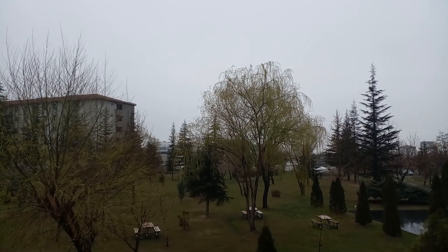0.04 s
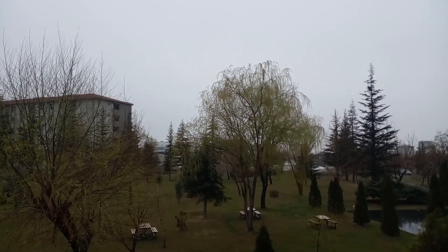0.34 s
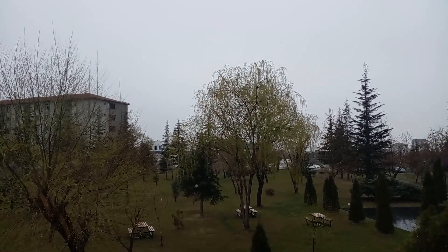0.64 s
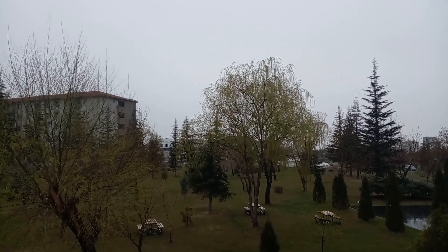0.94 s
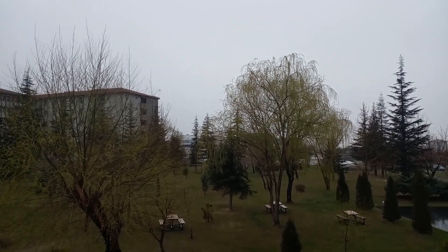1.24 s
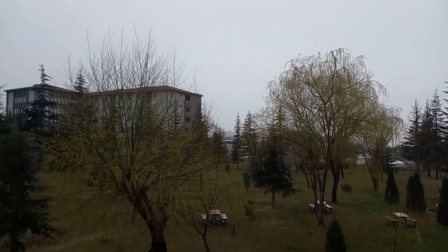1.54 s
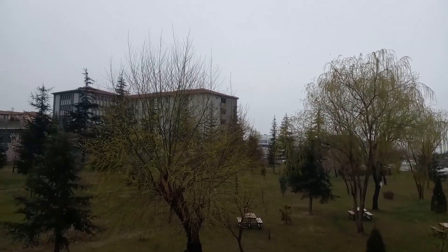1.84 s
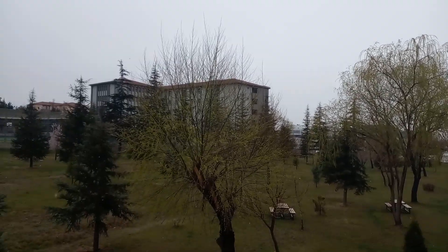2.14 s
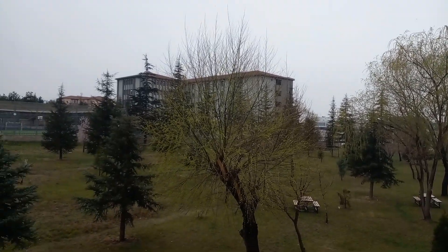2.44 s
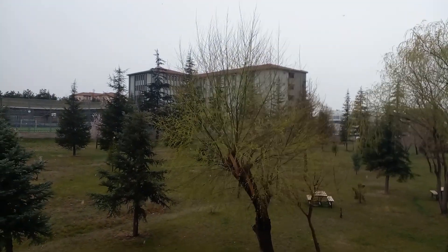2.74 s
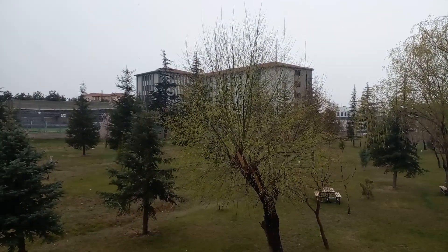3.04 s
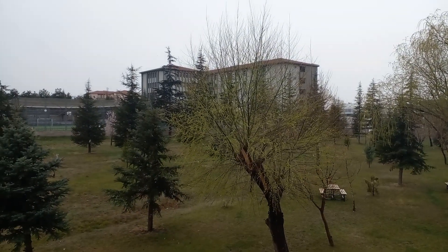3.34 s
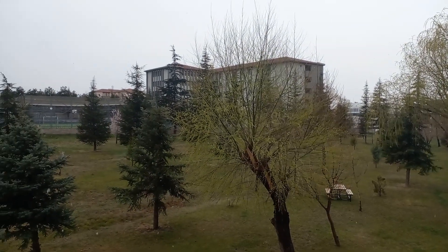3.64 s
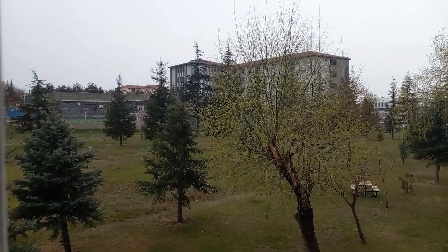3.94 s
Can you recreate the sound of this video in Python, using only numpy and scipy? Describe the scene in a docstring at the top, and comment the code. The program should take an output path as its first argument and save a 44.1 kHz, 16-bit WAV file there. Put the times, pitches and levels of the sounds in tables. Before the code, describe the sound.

Low, fluttering wind on the microphone in a quiet park with faint birdsong.

```python
"""A light wind buffets the microphone, in low fluttering gusts and soft thumps of single eddies.
Behind it lies a quiet park: distant traffic rolls on, and small birds give falling chirps and
short raspy calls that echo among the trees. A few faint ticks and a soft rustle sound close by.
Halfway through the microphone turns, which changes the colour of the traffic."""
import sys
import numpy as np
from scipy import signal
from scipy.fft import rfft, irfft
from scipy.io import wavfile
from scipy.ndimage import uniform_filter1d

SR = 44100
rng = np.random.default_rng(int(sys.argv[2]) if len(sys.argv) > 2 else 0)


def store_pcm(level_fs):
    """Save levels as 16-bit WAV."""
    pcm = np.round(np.clip(level_fs, -1, 1) * 32767).astype(np.int16)
    wavfile.write(sys.argv[1], SR, np.atleast_2d(pcm).T)


N = 176400
TIME = np.arange(N) / SR
BIN_HZ = np.arange(N // 2 + 1) * SR / N


def undb(db):
    """Decibels to gain."""
    return 10 ** (np.asarray(db) / 20)


def unit(x):
    """Scale to rms 1."""
    return x / np.sqrt(np.mean(x ** 2))


def curve(table, column=1):
    """An automation curve: one column of a table, joined by straight lines in time."""
    rows = np.array(table, float)
    return np.interp(TIME, rows[:, 0], rows[:, column])


def noise(colour, tilt_db=0):
    """Coloured noise of rms 1, tilted by tilt_db per octave and rolled off beyond the table's ends."""
    hz, db = np.array(colour, float).T
    octave, points = np.log2(np.maximum(BIN_HZ, 1)), np.log2(hz)
    octaves_outside = abs(octave - np.clip(octave, points[0], points[-1]))
    eq_db = np.interp(octave, points, db) + tilt_db * octave - 20 * octaves_outside
    return unit(irfft(rfft(rng.standard_normal(N)) * undb(eq_db), N))


def wander(hz):
    """Smooth random modulation of rms 1 that changes about hz times a second."""
    return unit(irfft(rfft(rng.standard_normal(N)) * np.exp(-2 * (BIN_HZ / hz) ** 2), N))


def swell(start, length):
    """A rounded rise and fall."""
    return np.sin(np.pi * np.clip((TIME - start) / length, 0, 1))


def phase_of(hz):
    """Running phase of a moving pitch."""
    return 2 * np.pi * np.cumsum(hz) / SR


def low_cut(x, hz, order):
    """Roll off everything below hz."""
    return signal.sosfilt(signal.butter(order, hz, "high", fs=SR, output="sos"), x)


# Road colour before and after the turn (frequency [Hz], relative level [dB])
ROAD_BEFORE = [(30, -13.5), (70, 12), (200, 11.5), (380, 0.5), (640, -3), (850, -2.5), (1000, -1.5),
               (1250, -5.5), (1480, -11), (1850, -8.5), (2150, -20.5), (2500, -34), (3500, -29.5),
               (4100, -33.5), (5000, -50.5)]
ROAD_AFTER = [(30, -3), (70, 14), (200, 8), (400, 1), (680, -4), (850, -2), (1000, -1), (1170, -4.5),
              (1480, -7.5), (1950, -16), (2450, -25), (3000, -27), (3500, -32.5), (4200, -40.5),
              (5000, -52.5)]
# Tyres singing on the far road (time [s], level [dB], pitch [Hz])
TYRE_SONG = [(0, -65.5, 1006), (1.0, -66, 994.5), (1.8, -61.5, 988.4), (2.22, -56, 1011), (2.5, -65, 983),
             (3.7, -62.5, 953), (3.92, -51.5, 892), (4.0, -53, 867)]


def traffic(turn_s=2.05, turn_length_s=.6, waver_db=1.22, song_width_hz=70):
    """A far road heard from two directions in turn, with a narrow band of tyre song."""
    turned = np.clip((TIME - turn_s) / turn_length_s + .5, 0, 1)
    before = np.sqrt(1 - turned) * undb(-42.5) * noise(ROAD_BEFORE)
    after = np.sqrt(turned) * undb(-43) * noise(ROAD_AFTER)
    phase = phase_of(curve(TYRE_SONG, column=2))
    song = unit(wander(song_width_hz) * np.cos(phase) + wander(song_width_hz) * np.sin(phase))
    return (before + after) * undb(waver_db * wander(hz=5.7)) + song * undb(curve(TYRE_SONG))


# Rustle fader, peaking just ahead of the turn (time [s], level [dB])
RUSTLE_LEVEL = [(0, -100), (1.33, -87.5), (1.42, -78), (1.49, -73), (1.53, -69.5), (1.63, -77), (1.8, -79),
                (1.95, -80), (2.15, -88.5), (4, -100)]
# Its airy colour (frequency [Hz], relative level [dB])
RUSTLE_COLOUR = [(2000, -12.5), (4500, -2), (7000, 1), (10000, -0.5), (11500, 0), (13500, 2), (16000, -0.5)]


def rustle(grain_db=1.5):
    """A faint grainy brushing close to the microphone."""
    return noise(RUSTLE_COLOUR) * undb(curve(RUSTLE_LEVEL) + grain_db * wander(hz=200))


# Tick cues (time [s], level before the low cut [dB], decay [s], tilt [dB/octave], low cut [Hz])
TICK_CUES = [(.138, -71.5, 0.013, -13, 5400), (.954, -58.5, 0.012, -14.5, 5400),
             (1.026, -59, 0.012, -5.5, 5900), (1.285, -64, .003, -8, 4000), (1.511, -48, .0028, -6.5, 4100),
             (1.695, -63.5, 0.01, -12.5, 5400), (2.043, -77, 0.013, -8, 5400),
             (2.722, -64, 0.0094, -8, 7000), (3.447, -64, 0.0046, -3, 3000)]
# Colour of the ring (frequency [Hz], relative level [dB])
TICK_COLOUR = [(2500, -18), (4200, -9), (5200, -11), (6200, -2), (7600, -7.5), (9200, -13.5), (11000, -4.5),
               (15500, -5.5)]


def ticks():
    """Small dry ticks with a sudden attack and a short bright ring."""
    out = np.zeros(N)
    for start, db, decay, tilt_db, low_hz in TICK_CUES:
        age = TIME - start
        envelope = undb(db) * (age >= 0) * np.exp(-np.clip(age / decay, 0, 20))
        out += low_cut(envelope * noise(TICK_COLOUR, tilt_db), low_hz, order=8)
    return out


# Rasp cues (time [s], length [s], body level [dB], overtone against body [dB])
RASP_CUES = [(0.756, 0.065, -57, -13), (0.846, 0.061, -66, -8.5), (2.466, 0.055, -70.5, -4),
             (2.537, 0.074, -71, -7), (2.79, 0.054, -64.5, -18), (3.825, 0.05, -63, -20)]
# Colours of the body and the overtone band (frequency [Hz], relative level [dB])
RASP_BODY = [(2000, -39.5), (2500, -8), (2750, 2), (3300, -2), (3900, -8), (4800, -33)]
RASP_OVERTONE = [(4700, -33.5), (5200, -15), (5600, -2), (6800, -2.5), (7900, -8.5), (9000, -21.5),
                 (14000, -25)]


def rasps(pulse_hz=175.6, depth=.21):
    """Harsh bird calls: two bands of noise roughened by a fast, unsteady pulse."""
    body, overtone = noise(RASP_BODY), noise(RASP_OVERTONE)
    pulsing = 1 + depth * np.sin(phase_of(pulse_hz * (1 + .1 * wander(hz=45))))
    out = np.zeros(N)
    for start, length, db, overtone_db in RASP_CUES:
        out += undb(db) * swell(start, length) ** 2 * (body + undb(overtone_db) * overtone)
    return pulsing * out


# Chirp cues (time [s], length [s], start pitch [Hz], end pitch [Hz], relative level [dB])
CHIRP_CUES = [(0, .09, 3575, 3150, -69.5), (0.284, .075, 4660, 3800, -65.5), (.365, .07, 4600, 3570, -60.5),
              (.435, .05, 4180, 3300, -59.5), (0.527, 0.075, 3925, 3360, -64.5),
              (.705, 0.054, 3984, 3224, -59.5), (1.091, 0.067, 4320, 3250, -59.5),
              (1.18, .04, 4640, 4380, -69.5), (1.227, 0.039, 3920, 3190, -59),
              (1.29, 0.049, 3990, 3300, -64), (1.858, 0.063, 4290, 3370, -64.5),
              (1.923, 0.044, 2800, 2550, -76), (2.218, 0.071, 4920, 4230, -66),
              (2.275, 0.069, 3680, 3470, -64.5), (2.31, 0.032, 4710, 4250, -65),
              (2.357, 0.039, 3730, 3490, -58), (2.475, .035, 3160, 2840, -60.5),
              (2.536, 0.042, 3420, 2740, -63), (2.60, .05, 3550, 2610, -65),
              (2.754, .045, 4920, 4270, -66.5), (2.793, .04, 3800, 3346, -62.5),
              (3.28, 0.04, 4570, 4350, -67.5), (3.33, 0.051, 3750, 2990, -56),
              (3.364, 0.044, 4750, 4270, -72), (3.426, 0.048, 3630, 2990, -59.5),
              (3.476, 0.023, 4700, 4390, -68), (3.507, 0.067, 4050, 2934, -62),
              (3.701, 0.055, 3620, 3190, -63), (3.802, 0.058, 3890, 2930, -56)]


def chirps(trim_db=-4, warble_depth=.03):
    """Warbling bird whistles that slide downward."""
    out = np.zeros(N)
    warble = 1 + warble_depth * wander(hz=500)
    for start, length, high, low, db in CHIRP_CUES:
        hz = np.interp(TIME, [start, start + length], [high, low]) * warble
        out += undb(db + trim_db) * swell(start, length) * np.sqrt(2) * np.sin(phase_of(hz))
    return out


def park_echo(x, t60_s):
    """Diffuse echo from trees and house fronts."""
    t = TIME[:SR]
    tail = rng.standard_normal(SR) * undb(-60 * t / t60_s) * (1 - np.exp(-t / .0035))
    return signal.fftconvolve(x, tail / np.sqrt(np.sum(tail ** 2)))[:N]


def birds():
    """Chirps scatter quickly off nearby branches; chirps and rasps both feed the park's longer echo."""
    whistles, calls = chirps(), rasps()
    scatter = park_echo(whistles, t60_s=.07)
    echo = park_echo(whistles + undb(-7.5) * calls, t60_s=.6)
    return undb(-5.5) * (whistles + scatter) + calls + undb(-2.5) * echo


# Single eddies hitting the microphone (time [s], peak level [dB], width [s], swing [Hz])
EDDY_HITS = [(0.116, -14, 0.0014, 88), (.152, -19, .0011, 90), (0.22, -14.5, 0.0011, 62),
             (0.245, -23, 0.0015, 66), (0.308, -18, 0.0011, 75), (.318, -19.5, 0.0013, 75),
             (.540, -19, 0.0023, 70), (.554, -10.5, 0.00088, 62), (0.576, -19.5, 0.003, 58),
             (.591, -23.5, .0026, 63.6), (.604, -22, 0.0024, 68), (.721, -10.5, 0.0011, 72),
             (0.758, -10.5, .0018, 72), (0.852, -17, 0.0011, 75), (0.886, -17.5, .0018, 75),
             (1.022, -16.5, 0.0025, 62), (1.041, -34, 0.0032, 66), (1.089, -20, 0.0021, 70),
             (1.111, -20, 0.0021, 75), (1.312, -19.5, 0.0026, 75), (1.351, -16.5, 0.0017, 85),
             (1.392, -16, 0.0021, 70), (1.454, -23, 0.0014, 80), (1.516, -15.5, 0.0016, 62),
             (1.616, -20, .0024, 80), (1.648, -17.5, 0.0019, 85), (1.688, -22, 0.002, 100),
             (1.815, -18.5, 0.0012, 95), (1.845, -18.5, 0.0016, 100), (1.859, -11.5, 0.0019, 105),
             (1.907, -15.5, .0018, 100), (2.099, -18.5, 0.0032, 80), (2.207, -18, 0.0017, 90),
             (2.654, -19.5, 0.0022, 95.3), (2.720, -12.5, .0019, 98), (2.807, -21, 0.0013, 80),
             (2.862, -18.5, .0011, 110), (2.89, -13.5, .0017, 85), (2.911, -22, 0.0011, 90),
             (3.342, -24.5, .0020, 100), (3.662, -19.5, 0.0019, 70), (3.738, -16, 0.0026, 66),
             (3.842, -21.5, .0014, 75)]


def eddies(lead_s=.02):
    """Each eddy is a short push; the microphone passes no slow pressure, so it swings and settles."""
    out = np.zeros(N)
    for time, db, width, swing_hz in EDDY_HITS:
        push = np.exp(-.5 * ((TIME[:SR // 8] - lead_s) / width) ** 2)
        swing = low_cut(push, swing_hz, order=4)
        at = int((time - lead_s) * SR)
        out[at:at + len(swing)] += undb(db) * (swing / abs(swing).max())[:N - at]
    return out


# Fader for the rush at the top of the longest gust (time [s], level [dB])
RUSH_LEVEL = [(0, -89), (1.6, -68.5), (1.68, -41), (1.77, -28), (1.83, -32), (1.9, -33), (1.98, -63),
              (4, -89)]
# Its low-mid colour (frequency [Hz], relative level [dB])
RUSH_COLOUR = [(90, -13), (135, 0.5), (200, -7), (270, -2), (350, -17.5), (480, -25.5), (700, -39.5)]


def rush():
    """The longest gust breaks into small eddies and flutters at a higher pitch."""
    return noise(RUSH_COLOUR) * undb(curve(RUSH_LEVEL))


# Wind strength at the microphone (time [s], level before brightening [dB])
GUST_LEVEL = [(0, -41.5), (.08, -37), (.22, -28), (.32, -31), (.4, -37), (.46, -29), (.52, -31.5),
              (.59, -28.5), (.66, -33.5), (.76, -25.5), (.82, -33.5), (.91, -34), (.96, -29), (1.05, -30.5),
              (1.11, -33), (1.17, -37), (1.29, -34.5), (1.4, -31), (1.53, -30.5), (1.58, -41.5),
              (1.66, -28.5), (1.80, -30.5), (1.9, -28), (1.97, -30.5), (2.14, -41.5), (2.21, -27.5),
              (2.3, -41), (2.43, -31.5), (2.55, -35.5), (2.63, -29), (2.9, -30.5), (2.98, -29), (3.24, -37),
              (3.35, -27.5), (3.45, -46), (3.6, -36.5), (3.68, -33), (3.82, -29.5), (4.0, -36)]
# Bass-heavy colour of the turbulence (frequency [Hz], relative level [dB])
WIND_COLOUR = [(20, -44), (35, -11), (55, -2.5), (80, 2), (125, 1.5), (170, -12.5), (260, -19), (380, -35),
               (700, -49.5), (2000, -79)]


def wind(crossover_hz=188, brightening=1.93, neutral_db=-32.5, flutter_db=1):
    """Fluttering turbulence at the microphone; stronger wind makes smaller eddies and sounds brighter."""
    gust_db = curve(GUST_LEVEL)
    flow = noise(WIND_COLOUR)
    flow /= np.sqrt(uniform_filter1d(flow ** 2, size=2600) + 1e-9)  # levelled, so the gusts lead
    large_eddies = signal.sosfiltfilt(signal.butter(3, crossover_hz, fs=SR, output="sos"), flow)
    small_eddies = (flow - large_eddies) * undb(brightening * (gust_db - neutral_db))
    return (large_eddies + small_eddies) * undb(gust_db + flutter_db * wander(hz=45.5))


def scene():
    """A mono mix: birds in the trees, wind up front, traffic far off and small sounds close by."""
    return (birds() + wind() + rush() + eddies() + traffic() + ticks() + rustle())[None]


def record(dry, hiss_db=-79, top_hz=15700):
    """The recorder adds a faint, nearly white hiss and cuts the top."""
    hiss = undb(hiss_db) * noise([(1000, 0), (5000, -.24), (9000, -.56), (14000, -.076), (16000, -1)])
    return signal.sosfilt(signal.ellip(10, .2, 80, top_hz, fs=SR, output="sos"), dry + hiss)


dry = scene()
out = record(dry)
store_pcm(out)
```